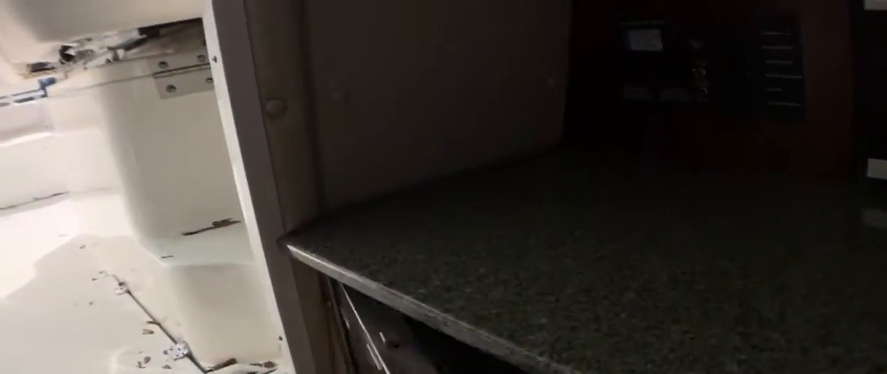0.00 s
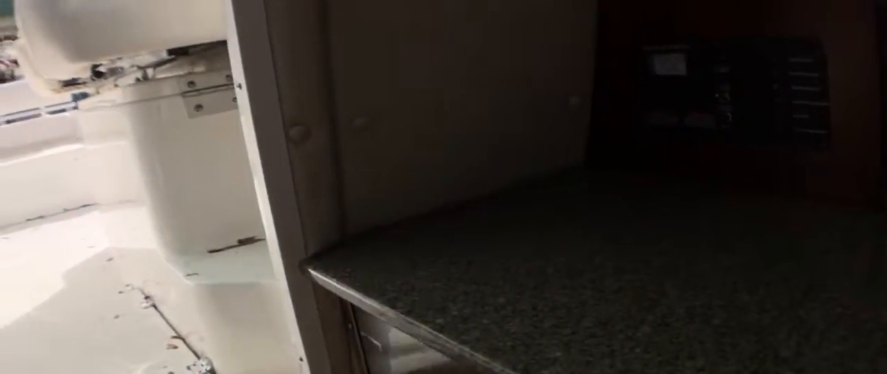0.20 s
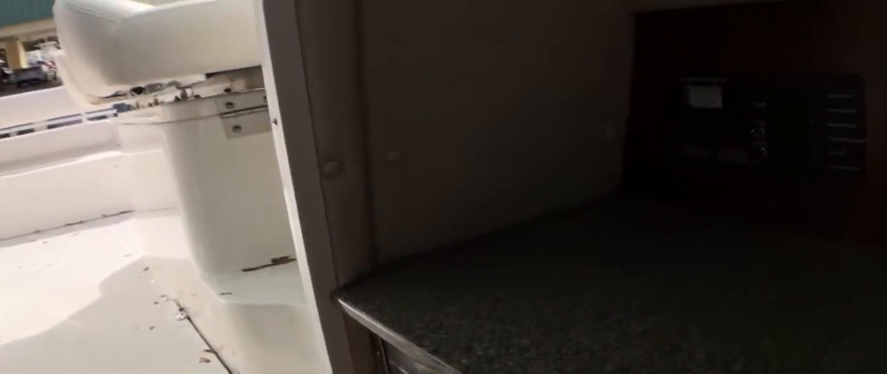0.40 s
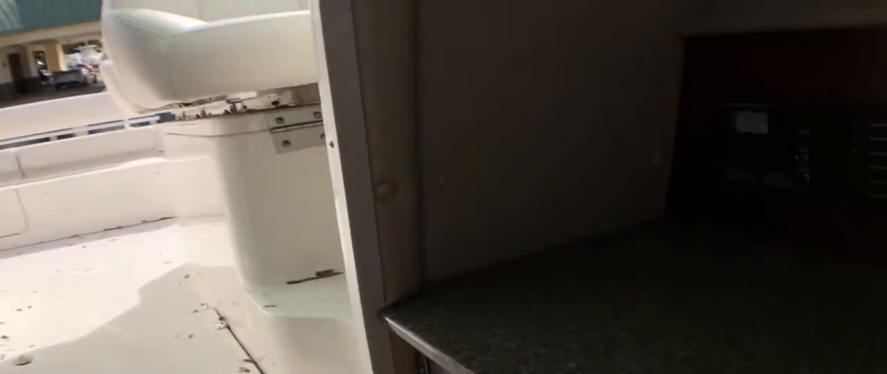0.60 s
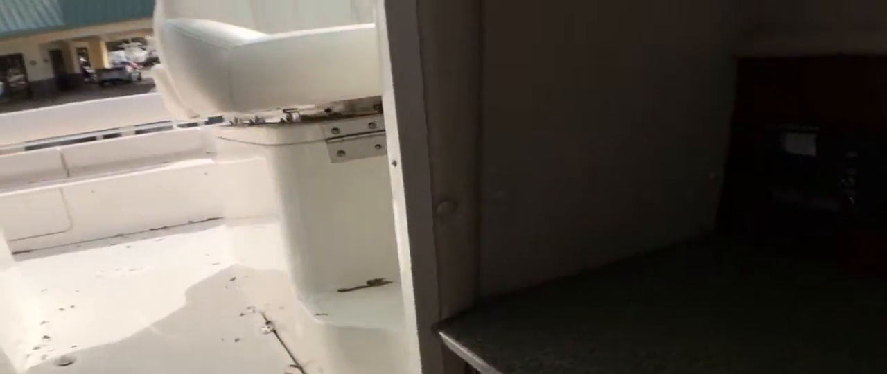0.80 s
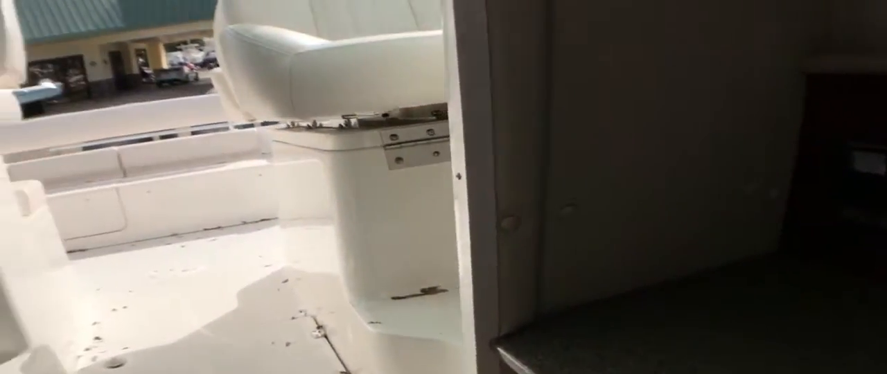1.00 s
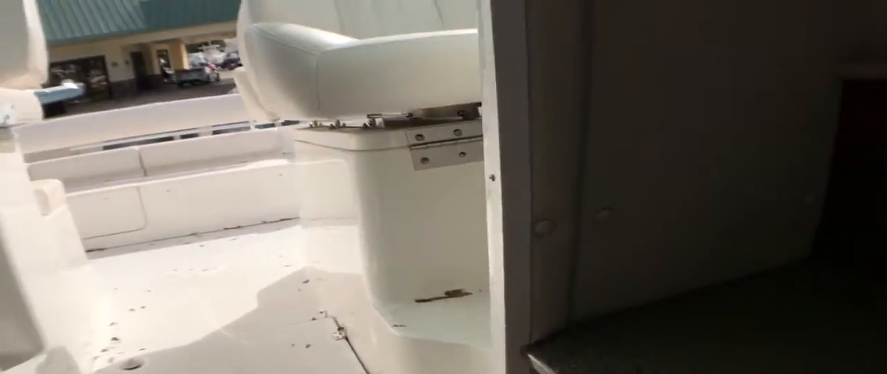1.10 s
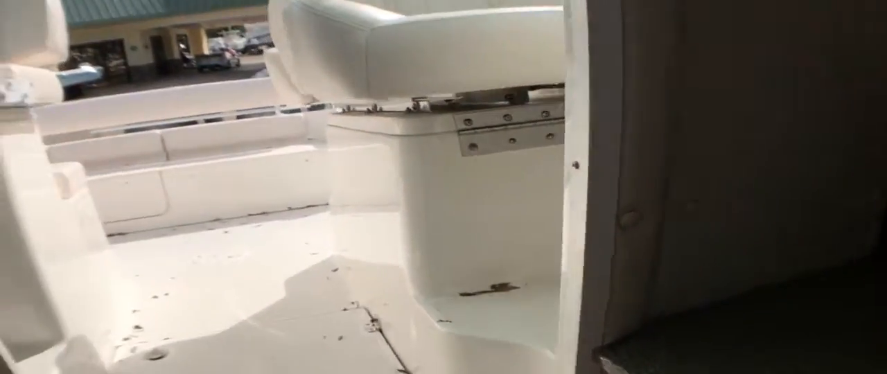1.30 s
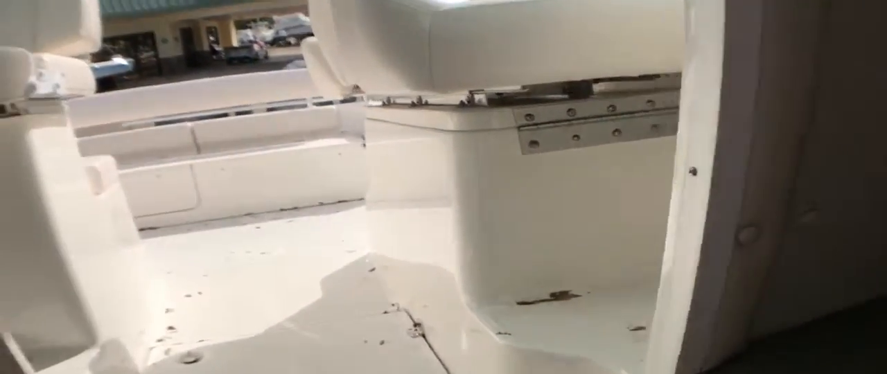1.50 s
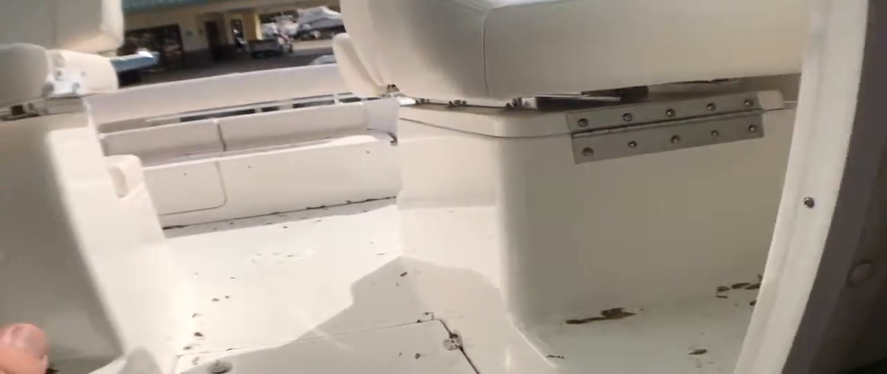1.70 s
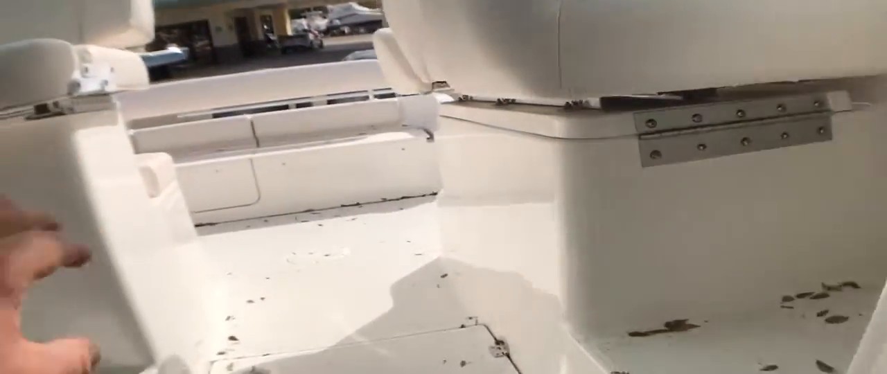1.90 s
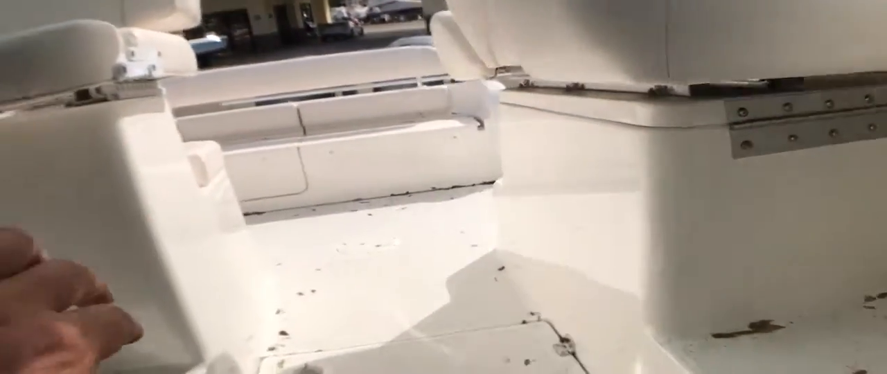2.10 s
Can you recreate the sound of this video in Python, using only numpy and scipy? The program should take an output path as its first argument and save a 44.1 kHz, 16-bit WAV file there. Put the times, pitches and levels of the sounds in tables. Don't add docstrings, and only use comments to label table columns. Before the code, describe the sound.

One loud, dull fibreglass bang with quick rebounds and a brief steel latch clink, dying fast in a small hard cabin; afterwards quiet rubbing, light footfalls and lumpy low wind rumble on a close handheld microphone.

```python
import sys
import numpy as np
from scipy import signal
from scipy.fft import rfft, irfft
from scipy.io import wavfile
from scipy.ndimage import uniform_filter1d

SR = 44100
rng = np.random.default_rng(int(sys.argv[2]) if len(sys.argv) > 2 else 0)


def to_linear_factor(level_db):
    exponent = np.asarray(level_db, float) / 20
    return 10 ** exponent


def generate_wav(signal):
    frames = np.transpose(np.atleast_2d(signal))
    scaled = np.clip(frames, -1, 1) * 32767
    pcm = np.round(scaled).astype(np.int16)
    wavfile.write(sys.argv[1], SR, pcm)


N = 97020


def evened(x):
    return x / np.sqrt(np.mean(x ** 2) + 1e-20)


def read_spectrum(points, hz):
    point_hz, level_db = np.transpose(points)
    return np.interp(np.log(hz + 1), np.log(point_hz + 1), level_db, left=-90, right=-90)


def curve(rows, t):
    return np.interp(t, *np.transpose(rows))


def add(mix, start_s, sound):
    part = mix[round(start_s * SR):][:len(sound)]
    part += sound[:len(part)]


def coloured(x, points, tilt_db=0):
    hz = np.fft.rfftfreq(len(x), 1 / SR)
    gain_db = read_spectrum(points, hz) - tilt_db * np.log2(hz / 2000 + 1e-3)
    return evened(irfft(rfft(x) * to_linear_factor(gain_db), len(x)))


def grains(size, spread_db):
    lumps = evened(uniform_filter1d(rng.standard_normal(size), size=60))
    return rng.standard_normal(size) * to_linear_factor(spread_db * lumps)


def modes(table, t, damping):
    ring = 0
    for hz, level_db, t60_s in table:
        decay_db = 60 * t * damping / min(t60_s, .25)
        ring = ring + to_linear_factor(level_db - decay_db) * np.sin(2 * np.pi * hz * t)
    return ring


# pitch_hz, level_db [dB per Hz]
AIR_SPECTRUM = [(97, -47), (165, -12), (200, 3), (369, -5), (406, -2.5), (630, -5.5), (1080, -4.5),
                (1840, -15), (16000, -38)]
# time_s, level_db
TRAFFIC_NEARNESS = [(0.5, -47.5), (1.564, -45.5), (1.914, -44.5), (2.2, -45)]
# time_s, level_db
HISS_LEVEL = [(0.55, -62), (1.008, -61.5), (1.132, -65), (1.4, -66), (1.932, -62.5), (2.2, -65)]
AIR_DB, TOP_LIFT_DB = -45, 4


def air():
    hop, size = 256, 1024
    frames, hz = N // hop + 5, np.fft.rfftfreq(size, 1 / SR)
    real, imag, patches = rng.standard_normal((frames, size // 2 + 1, 3)).T
    patches = uniform_filter1d(patches, size=8, axis=0)
    patches = evened(uniform_filter1d(patches, size=12, axis=1))
    t = np.arange(frames) * hop / SR
    near_db, hiss_db = curve(TRAFFIC_NEARNESS, t), curve(HISS_LEVEL, t)
    follow = np.interp(hz, [1800, 4000], [1, 0])[:, None]
    motion_db = follow * (near_db - near_db.mean()) + (1 - follow) * (hiss_db - hiss_db.mean())
    tone_db = read_spectrum(AIR_SPECTRUM, hz) + np.interp(hz, [9000, 13000], [0, TOP_LIFT_DB])
    z = (real + 1j * imag) * to_linear_factor(tone_db[:, None] + 1.74 * patches + motion_db)
    noise = signal.istft(z, nperseg=size, noverlap=size - hop)[1][:N]
    return to_linear_factor(AIR_DB) * evened(noise)


# pitch_hz, level_db [dB per Hz]
RUMBLE_SPECTRUM = [(8.8, 5), (15, 2.5), (38, 1), (80, 4), (113, 0), (131, -2.5), (146, -10.5), (151, -36.5),
                   (200, -11.5), (260, -53.5), (440, -120)]
# time_s, level_db
GUST_LEVEL = [(.5, -37.5), (.9, -37), (1.22, -41), (1.45, -31.5), (1.56, -40), (1.67, -35), (2.04, -40),
              (2.2, -32.5)]


def rumble():
    level_db = curve(GUST_LEVEL, np.arange(N) / SR) + 0.95
    return coloured(rng.standard_normal(N), RUMBLE_SPECTRUM) * to_linear_factor(level_db)


# start_s, level_db, centre_hz, t60_s, band_ratio
HOLLOW_EVENTS = [(0.218, -24.5, 496, 0.19, 1.14), (.225, -29, 300, 0.21, 1.19),
                 (.26, -19, 240, 0.28, 1.165), (.266, -24.5, 111.3, 0.41, 1.235),
                 (0.216, -28.5, 5500, 0.075, 1.01), (.263, -19.5, 2230, 0.11, 1.52),
                 (.264, -29.5, 890, 0.13, 1.44), (1.058, -41, 560, 0.26, 1.87),
                 (1.309, -42.5, 216, 0.37, 1.23), (1.41, -35.5, 219, 0.25, 1.18),
                 (2.02, -55, 323, 0.14, 0.92)]
HOLLOW_RISE_S = 0.0071


def hollow(level_db, centre_hz, t60_s, band_ratio):
    t = np.arange(SR // 3) / SR
    settle = SR // 10
    band_ratio = max(band_ratio, 1.02)
    edges_hz = [centre_hz / band_ratio, centre_hz * band_ratio]
    band = signal.butter(2, edges_hz, "bandpass", fs=SR, output="sos")
    noise = signal.sosfilt(band, rng.standard_normal(len(t) + settle))[settle:]
    noise = noise / np.sqrt(np.mean(noise[:SR // 20] ** 2))
    return to_linear_factor(level_db - 60 * t / t60_s) * np.minimum(t / HOLLOW_RISE_S, 1) * noise


# start_s, level_db, t60_s, crack_db
KNOCK_EVENTS = [
    (0.219, -23, 0.19, -45),
    (0.2625, -21, 0.17, -8),
    (0.2657, -19.5, 0.089, -28),
    (0.4054, -34.5, 0.15, -31.5),
    (1.417, -48, 0.19, -30.5),
    (1.429, -45.5, 0.17, -35),
]
# pitch_hz, level_db [dB per Hz]
PANEL_SPECTRUM = [(88, -22), (150, -12), (406, -13.5), (524, -18.5), (1560, -19), (1830, -17.5),
                  (2060, -21.5), (3350, -22.5), (16000, -39.5)]
# pitch_hz, level_db, t60_s
PANEL_RING = [(679, -4.5, 0.41), (1083, -15, 0.32), (1620, -16, 0.058), (2120, 8, 0.047), (2570, -2, 0.091),
              (3200, -19, 0.085), (3500, -29, 0.078), (3100, -3, 0.067), (4260, -33, 0.5)]
KNOCK_RISE_S, TREBLE_DAMPING, RING_DB, GRAIN_DB = 0.0024, 1.13, -6, 3.5
CRACK_HZ, CRACK_WIDTH_HZ, CRACK_T60_S = 3750, 900, .015


def knock(level_db, t60_s, crack_db):
    t = np.arange(SR // 3) / SR
    grit = coloured(grains(len(t), GRAIN_DB), PANEL_SPECTRUM)
    low = signal.lfilter(*signal.butter(2, 3000, fs=SR), grit)
    high = grit - low
    wash = low * to_linear_factor(-60 * t / t60_s) + high * to_linear_factor(-60 * t * TREBLE_DAMPING / t60_s)
    wash = wash * np.minimum(t / KNOCK_RISE_S, 1)
    ring = modes(PANEL_RING, t, 0.9)
    ring = to_linear_factor(RING_DB) * ring / np.abs(ring).max()
    snap = rng.standard_normal(len(t)) * to_linear_factor(-60 * t / CRACK_T60_S)
    radius = np.exp(-np.pi * CRACK_WIDTH_HZ / SR)
    resonator = [1, -2 * radius * np.cos(2 * np.pi * CRACK_HZ / SR), radius * radius]
    crack = 0.31 * snap + 0.15 * signal.lfilter([1], resonator, snap)
    return to_linear_factor(level_db) * (wash + 2 * ring) + to_linear_factor(crack_db) * crack


CABIN_T60_S, CABIN_DB = 0.12, -6.5


def cabin(x):
    t = np.arange(SR // 4) / SR
    signs = rng.choice([-1., 1.], len(t))
    echoes = signs * (rng.random(len(t)) < .1) * (t > .002)
    tail = echoes * to_linear_factor(-60 * t / CABIN_T60_S)
    return x + to_linear_factor(CABIN_DB) * signal.fftconvolve(x, tail / np.linalg.norm(tail))[:N]


# start_s, level_db, length_s, damping [1 = free], seated [0-1]
RATTLE_EVENTS = [
    (0.2202, -40.5, 0.011, 0.88, 0.43),
    (0.296, -48, 0.022, 1.3, 1),
    (0.408, -32, 0.018, 0.99, 0.13),
]
LATCH_PITCH_HZ = [3117, 4258, 4377, 5340, 6085, 7200, 8592, 9437, 9588, 11390, 12880, 13980, 14942]
# free_db, t60_s, held_db [seated in striker]
LATCH_MODES = [(-28, .08, -26), (-12, .16, -16), (-12, .16, -18), (-11, .22, -3), (-6, .1, -14),
               (-18, .06, -20), (-10, .24, -14), (-11, .17, -18), (-9, .18, -14), (-1, .11, -6),
               (-14, .2, -22), (-12, .06, -14), (-10, .15, -16)]
CHATTER_PER_S, CHATTER_SPREAD_DB = 1500, 1.5
WOBBLE_DB, CLATTER_DB = 3.5, -8


def rattle(level_db, length_s, damping, seated):
    t = np.arange(SR // 3) / SR
    luck, force = rng.random(len(t)), rng.exponential(1, len(t))
    hits = (luck < CHATTER_PER_S / SR) * to_linear_factor(CHATTER_SPREAD_DB * force)
    hits = hits * np.exp(-np.minimum(t / length_s, 4) ** 3)
    hits[0] = 2
    clatter = evened(np.diff(grains(len(t) + 1, 3.4)))
    out = to_linear_factor(CLATTER_DB) * clatter * np.exp(-t / length_s)
    for hz, (free_db, t60_s, held_db) in zip(LATCH_PITCH_HZ, LATCH_MODES):
        ring = signal.fftconvolve(hits, modes([(hz, 0, t60_s)], t, damping))[:len(t)]
        wobble = evened(uniform_filter1d(rng.standard_normal(len(t)), size=300))
        ring = ring * to_linear_factor(WOBBLE_DB * wobble)
        mode_db = free_db + seated * (held_db - free_db)
        out += to_linear_factor(mode_db) * ring / np.sqrt(np.mean(ring[:SR // 20] ** 2))
    return to_linear_factor(level_db) * out


# start_s, peak_db, settled_hz, extra_pitch_share [at start], length_s
THUMP_EVENTS = [
    (.238, -21, 45, .2, .026),
    (.2645, -4.5, 47, 1.55, .0335),
    (.312, -11.5, 42, .5, .038),
    (.354, -18, 68, .1, .028),
    (.398, -20, 36, .1, .045),
    (.441, -27, 42, .1, .04),
    (.515, -29, 36, .1, .04),
    (2.098, -23, 40, .1, .045),
]
SKEW, SAG_S = .65, .008


def thump(peak_db, settled_hz, extra_pitch_share, length_s):
    t = np.arange(0, length_s, 1 / SR)
    pitch_hz = settled_hz * (1 + extra_pitch_share * np.exp(-t / SAG_S))
    turns = np.cumsum(pitch_hz) / SR
    swell = abs(np.sin(np.pi * (t / length_s) ** SKEW)) ** .7
    return -to_linear_factor(peak_db) * swell * np.sin(2 * np.pi * turns)


# start_s, length_s, level_db, dullness_db [per octave]
SCUFF_EVENTS = [
    (0.738, 0.45, -47.5, 12.5),
    (.93, 0.34, -47, 1.5),
    (1.061, 0.11, -49.5, -1.5),
    (1.319, 0.037, -58, -3.5),
    (1.403, 0.021, -44, -3),
    (1.413, 0.045, -39.5, -3.5),
    (1.498, 0.037, -47.5, 1),
    (1.584, 0.065, -51, -1),
    (1.856, 0.31, -56, -4.5),
]
# pitch_hz, level_db [dB per Hz]
SCUFF_SPECTRUM = [(880, -32), (1500, -3), (1900, -4.5), (2020, 2), (2320, 2), (3690, -7), (4970, -10.5),
                  (14100, -16.5), (16000, -25)]


def scuff(length_s, level_db, dullness_db):
    u = np.arange(0, 2 * length_s, 1 / SR) / length_s
    noise = coloured(grains(SR, 1.6), SCUFF_SPECTRUM, dullness_db)[:len(u)]
    swell = abs(u * 2.63 * np.exp(1 - u * 3.21)) ** 2.37
    return to_linear_factor(level_db) * noise * swell


def scene():
    mix, knocks = air() + rumble(), np.zeros(N)
    for bus, events, source in ((mix, HOLLOW_EVENTS, hollow), (knocks, KNOCK_EVENTS, knock),
                                (mix, RATTLE_EVENTS, rattle), (mix, THUMP_EVENTS, thump),
                                (mix, SCUFF_EVENTS, scuff)):
        for start_s, *settings in events:
            add(bus, start_s, source(*settings))
    return (mix + cabin(knocks))[None]


def band_limit(x):
    return signal.sosfilt(signal.butter(12, 16990, fs=SR, output="sos"), x)


MIC_DIP_HZ, MIC_DIP_WIDTH_HZ, MIC_DIP_DB = 10450, 450, -4
EDGE_HZ = 15900


def record(dry):
    hz = np.fft.rfftfreq(N, 1 / SR)
    dip_db = MIC_DIP_DB * np.exp(-((hz - MIC_DIP_HZ) / MIC_DIP_WIDTH_HZ) ** 2)
    x = irfft(rfft(dry) * to_linear_factor(dip_db), N)
    lowpass = signal.firwin(511, EDGE_HZ, window=("kaiser", 5), fs=SR)
    x = signal.oaconvolve(x, lowpass[None], "same")
    return band_limit(x)


dry = scene()
out = record(dry)
generate_wav(out)
```